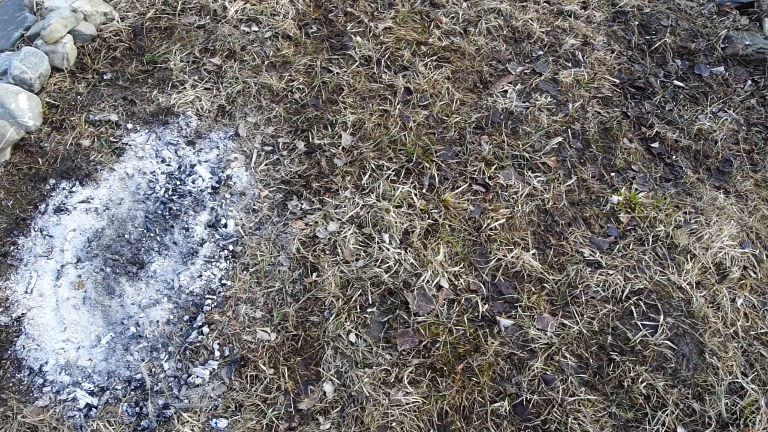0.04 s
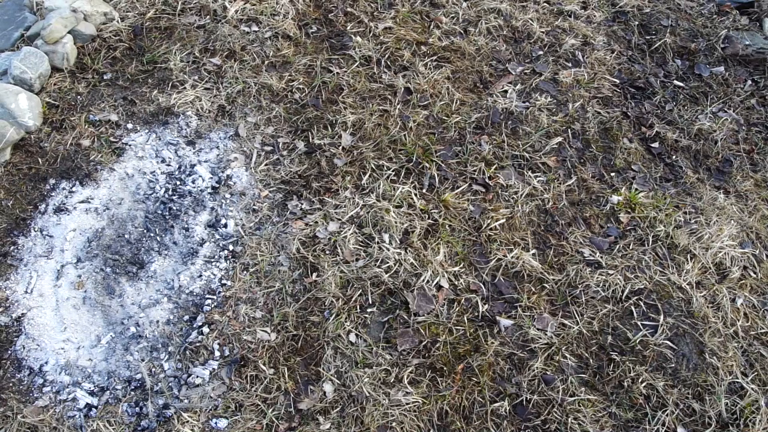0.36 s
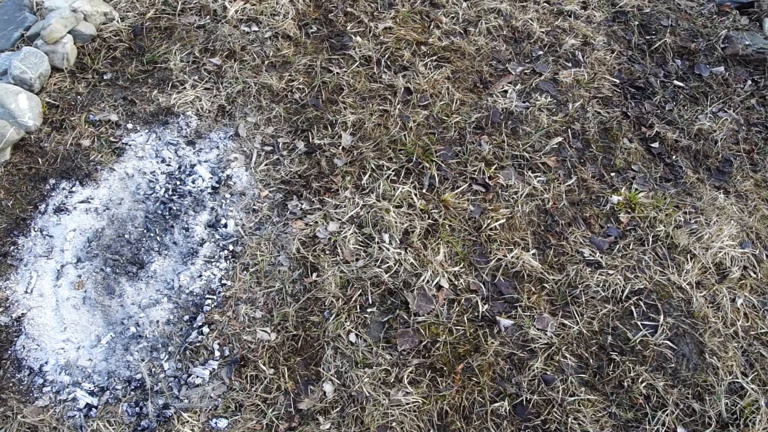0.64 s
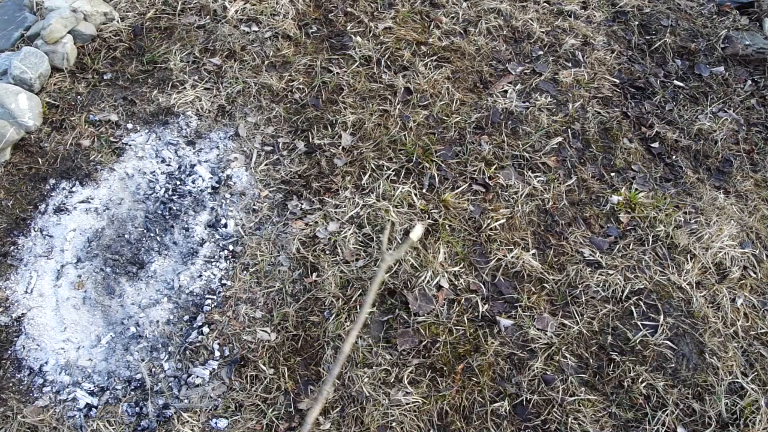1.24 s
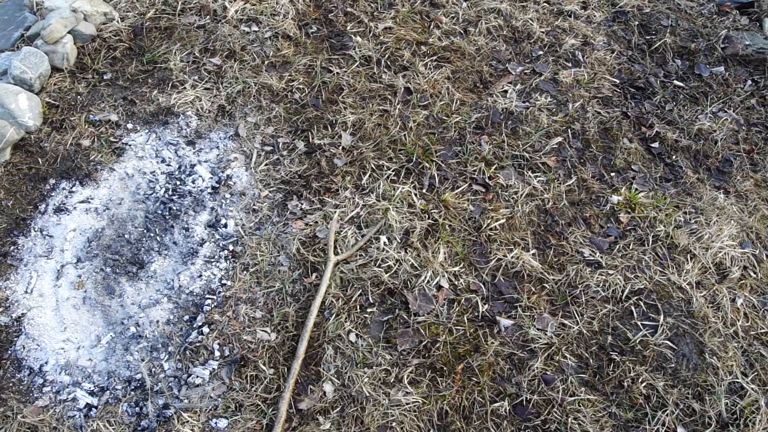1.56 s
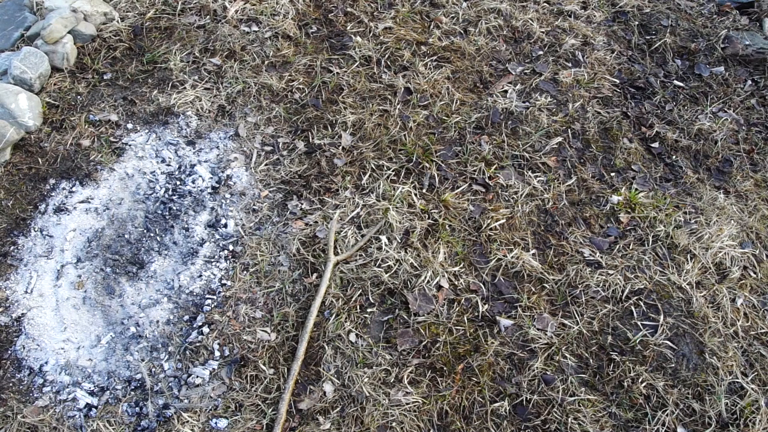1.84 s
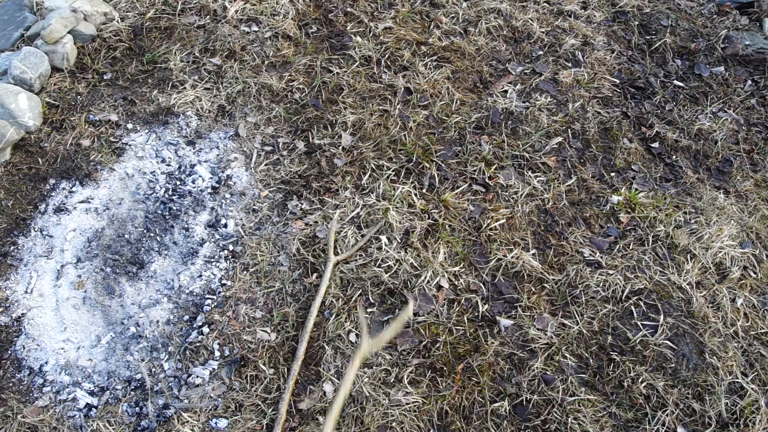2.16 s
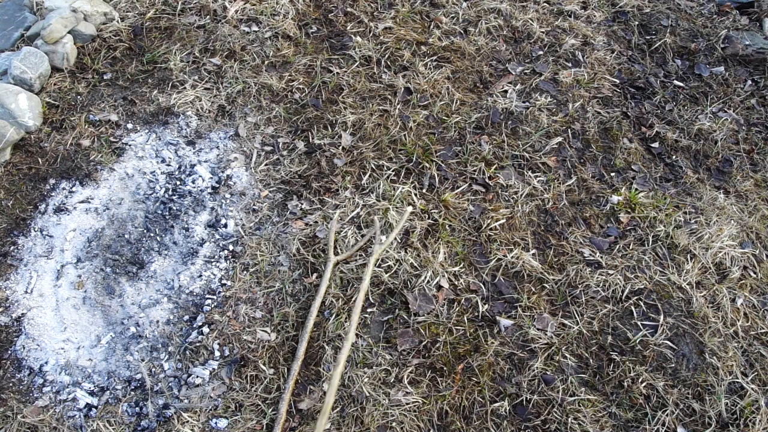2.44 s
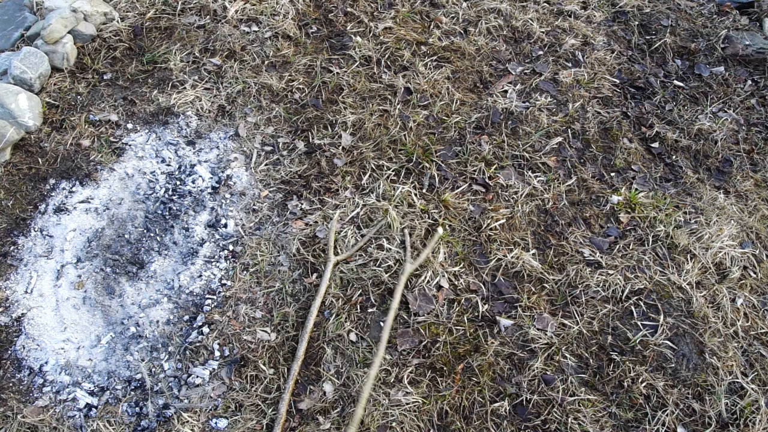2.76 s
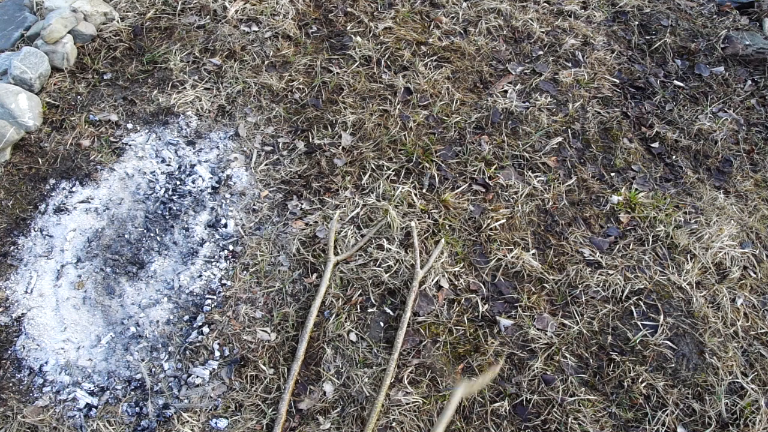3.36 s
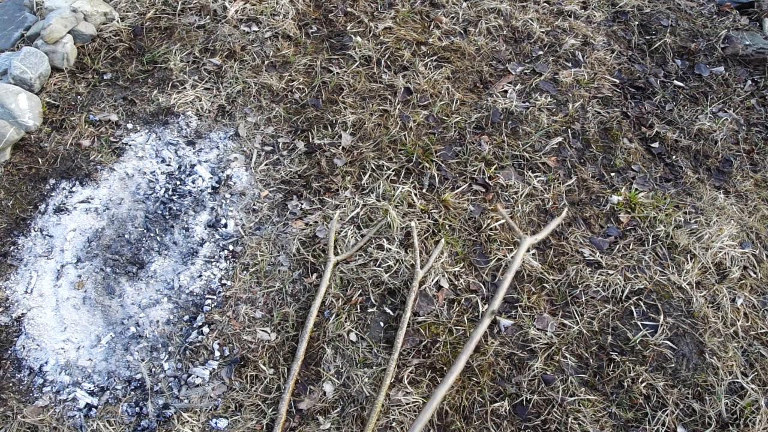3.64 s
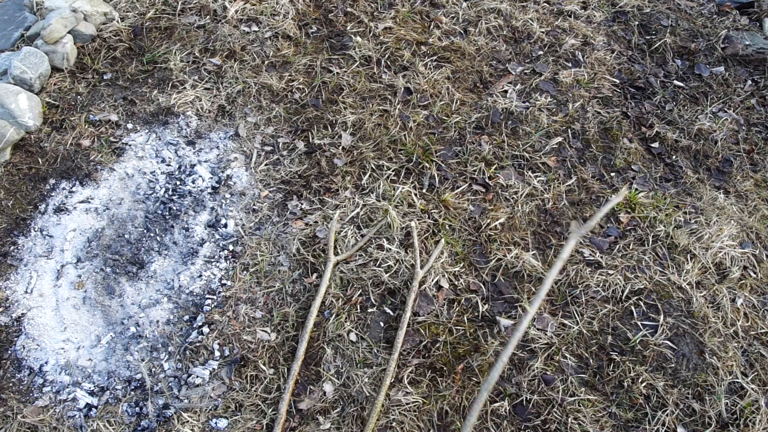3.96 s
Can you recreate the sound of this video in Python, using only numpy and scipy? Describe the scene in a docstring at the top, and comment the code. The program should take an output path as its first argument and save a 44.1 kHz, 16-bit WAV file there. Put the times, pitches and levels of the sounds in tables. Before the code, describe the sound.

Three wooden sticks clack onto dry grass close by, one after another, the first loudest. Each landing brings a crunch and a dull bump, with soft swishes and tiny snaps between. Distant water rushes steadily outdoors.

```python
"""Distant water rushes steadily, a little to the right, under a few faint, high whistles.
Dry stalks swish softly and give tiny snaps. Three forked wooden sticks are laid on the dry grass,
one after another: each crushes the stalks, clacks as the wood rings, and bumps the soil.
The first clack is loud enough to make a limiter turn everything down for a moment."""
import sys
import numpy as np
from scipy import signal
from scipy.fft import rfft, irfft, next_fast_len
from scipy.io import wavfile
from scipy.ndimage import uniform_filter1d, minimum_filter1d, map_coordinates

SR = 44100
rng = np.random.default_rng(int(sys.argv[2]) if len(sys.argv) > 2 else 0)


def log_audio(samples):
    """Write samples as a 16-bit WAV file to the path given in sys.argv[1]."""
    # one column per channel
    frames = np.atleast_2d(samples).T
    # limit to full scale, then quantise
    limited = np.clip(frames, -1, 1)
    pcm = np.round(limited * 32767).astype(np.int16)
    wavfile.write(sys.argv[1], SR, pcm)


N = 176400
T = np.arange(N) / SR
SHARP_ATTACK_S = 0.000088
# the tones heard in each stick's clack (pitch [Hz], level [dB], fade [s]);
# the highest in the first clack is a thin ping, perhaps the microphone ringing
FIRST_STICK = [(1550, -1.5, 0.0036), (1950, -2.5, 0.0054), (3050, 2, 0.0027), (3530, -3.5, 0.0017),
               (11250, -8.5, 0.0022)]
SECOND_STICK = [(1570, -18, 0.035), (1800, -16, 0.054), (2000, -10, 0.036), (2150, -8.5, 0.036),
                (2407, -9, 0.041), (2800, -4.5, 0.031), (3500, -3, 0.0081), (3830, 1, 0.011),
                (4230, -5, 0.012), (4670, -13, .01), (5400, -11, 0.011)]
THIRD_STICK = [(352, -22, .05), (497, -25, .025), (680, -22, 0.022), (1370, -13, 0.01), (2870, -8, 0.019),
               (3050, -3.5, 0.0094), (3840, -2, 0.0043), (4500, -18, 0.0044), (6020, -8.5, .005),
               (7700, -13, 0.0037), (11200, -9, 0.0035)]


def amp(db):
    """Turn decibels into a gain."""
    return 10 ** (np.asarray(db) / 20)


def unit(x):
    """Scale x to an average (rms) level of 1."""
    return x / np.sqrt(np.mean(x ** 2) + 1e-20)


def along(points, hz):
    """Read between (frequency, value) points on a log axis."""
    freqs, values = np.transpose(points)
    return np.interp(np.log(hz + 1), np.log(freqs + 1), values)


def sides(pan_db):
    """Left and right gains; a pan above 0 is to the left."""
    return amp(np.array([[.5], [-.5]]) * pan_db)


def filtered(x, response):
    """Scale each frequency in x by response(hz)."""
    size = next_fast_len(N + SR // 2)
    return irfft(rfft(x, size) * response(np.fft.rfftfreq(size, 1 / SR)), size)[..., :N]


def coloured(x, spectrum):
    """Give x a tone colour, at level 1."""
    return unit(filtered(x, lambda hz: amp(along(spectrum, hz))))


def wobble(rate):
    """A smooth curve through rate random points a second."""
    return map_coordinates(rng.standard_normal(int(N * rate / SR) + 4), [T * rate])


def decay(age, fade, attack):
    """A quick rise at age 0, then a fall of 60 dB every fade seconds."""
    t = np.maximum(age, 0)
    return 1000 ** (-t / fade) * (1 - np.exp(-t / attack))


def swell(peak, rise, fall):
    """Climb 20 dB in the rise time before the peak; drop 20 dB in the fall time after."""
    return 10 ** -np.maximum((peak - T) / rise, (T - peak) / fall)


def water(level_db=-36, waver_db=0.17):
    """Far water rushes steadily: alike in both ears in the bass, wide in the treble."""
    # tone of the rush (frequency [Hz], level [dB])
    spectrum = [(25, -43), (55, -43), (85, -38), (113, -27.5), (161, -16), (250, -9.5), (350, -8.5),
                (410, -9.5), (560, -5), (930, -1), (1390, -2), (2330, -4.5), (3300, -9.5), (5000, -13.5),
                (6850, -19), (9000, -19), (11400, -22), (12600, -25), (15500, -31.5)]
    # how alike the ears are (frequency [Hz], likeness [-1 to 1])
    likeness = [(60, .92), (160, 0.98), (270, 0.96), (450, 0.87), (740, 0.66), (1220, 0.29), (2010, 0.36),
                (3330, 0.26), (5500, -0.38), (9080, -0.14), (15000, 0.0059)]
    # lean to the right (frequency [Hz], pan [dB])
    pan = [(60, -2), (130, 0.0), (290, -0.5), (640, -2.5), (1410, -5), (3100, -5.0), (6820, -3.5),
           (15000, -2.0)]

    def shares(hz):
        width = np.arccos(np.clip(along(likeness, hz), -1, 1)) / 2
        return amp(along(spectrum, hz)) * [np.cos(width), np.sin(width)]

    mid, side = filtered(rng.standard_normal((2, N)), shares)
    rush = filtered(np.array([mid + side, mid - side]), lambda hz: sides(along(pan, hz)))
    return amp(level_db + waver_db * wobble(4.74)) * unit(rush)


def whistles(pitch_hz=11230, width_hz=110, length_s=0.1, edge_s=0.015):
    """Short, thin, fuzzy notes on one pitch, off to the left, perhaps from an insect."""
    # (start [s], level [dB])
    notes = [(-0.03, -62), (0.81, -61.5), (1.935, -62), (2.89, -62), (3.335, -62)]
    tone = unit(filtered(rng.standard_normal(N), lambda hz: np.exp(-((hz - pitch_hz) / width_hz) ** 2)))
    level = sum(amp(db) * np.clip(np.minimum(T - s, s + length_s - T) / edge_s, 0, 1) for s, db in notes)
    return sides(pan_db=8) * level * tone


def stalks(spectrum, clicks_per_s, hiss):
    """Dry stalks make many tiny clicks over a rubbing hiss."""
    clicks = (rng.random(N) < clicks_per_s / SR) * rng.standard_normal((2, N))
    return coloured(unit(clicks) + hiss * rng.standard_normal((2, N)), spectrum)


def swishes():
    """Soft brushing, perhaps of a sleeve or of grass, swells and fades."""
    # (peak time [s], level [dB], rise [s], fall [s], pan [dB])
    strokes = [(.16, -51, .04, .06, 2), (.31, -41.5, 0.099, .06, 5), (1.48, -45.5, .07, .12, -1),
               (1.585, -39.5, 0.063, 0.055, -1), (1.705, -41, 0.04, 0.047, 4), (1.735, -47, .02, .03, 3),
               (2.243, -44, .015, .04, 1), (2.77, -44, 0.074, .05, -1), (2.905, -39.5, 0.049, 0.065, -1)]
    # tone of a swish (frequency [Hz], level [dB])
    spectrum = [(1000, -29), (4000, -4), (7000, -5.5), (10500, 0), (13000, -1), (15500, -4)]
    level = sum(amp(db) * swell(s, rise, fall) * sides(pan) for s, db, rise, fall, pan in strokes)
    return level * stalks(spectrum, clicks_per_s=7000, hiss=1.4)


def snaps(fade_s=0.0077):
    """Single dry stalks break, each with a tiny burst of bright noise."""
    # (time [s], level [dB], pan [dB])
    breaks = [(0.6851, -19.5, -5), (0.93, -31, -1), (1.293, -26, -5), (1.465, -34, -2), (1.7755, -37, -2.5),
              (3.508, -34, -4), (3.699, -29, -5.5)]
    # tone of a snap (frequency [Hz], level [dB])
    spectrum = [(1000, -25), (3900, -14), (4750, 6.5), (5500, -5), (6800, -9), (8300, 1), (9600, -4.5),
                (11300, 3), (12400, -2), (13600, 2), (15500, -1)]
    level = sum(amp(db) * decay(T - s, fade_s, SHARP_ATTACK_S) * sides(pan) for s, db, pan in breaks)
    return level * coloured(rng.standard_normal((2, N)), spectrum)


def crunches():
    """Grass crackles as a stick crushes it."""
    # (peak time [s], level [dB], rise [s], fall [s])
    presses = [(1.173, -39, .004, 0.02), (1.193, -28.5, 0.025, 0.029), (1.207, -34.5, .014, .028),
               (1.228, -33, .016, 0.025), (1.250, -26, 0.0074, 0.021), (1.275, -43, .03, .12),
               (2.599, -33.5, 0.026, 0.018), (2.6099, -20, 0.0076, 0.0046), (2.616, -34.5, 0.017, .04),
               (3.841, -27.5, .005, 0.025), (3.876, -41, 0.022, .025)]
    # tone of a crunch (frequency [Hz], level [dB])
    spectrum = [(300, -30), (1000, -5), (2600, -3.5), (5000, -3), (7000, -4.5), (9500, -1.5), (11400, -1),
                (13000, -3.5), (15500, -1)]
    level = sum(amp(db) * swell(s, rise, fall) for s, db, rise, fall in presses)
    return level * sides(pan_db=-0.5) * stalks(spectrum, clicks_per_s=4500, hiss=1.0)


def clacks(tail_fade_s=0.021):
    """Each stick cracks on contact and rings briefly; ground and stones scatter a short tail."""
    # contacts; the second stick rattles before it lies still (time [s], tones, ring [dB],
    # ring cutoff [Hz], crack [dB], crack fade [s], tail [dB], pan [dB])
    landings = [(1.2420, FIRST_STICK, 4, 16000, -1.5, 0.0037, -11, 0),
                (2.5779, SECOND_STICK, -12.5, 8000, -20, 0.0082, -5, -3),
                (2.5802, SECOND_STICK, -20, 3000, -32, 0.006, -7, -4),
                (2.5860, SECOND_STICK, -27, 3000, -33, 0.005, 0, -4),
                (2.5900, SECOND_STICK, -26, 2300, -38, 0.005, -13, -2),
                (2.5982, SECOND_STICK, -28, 3000, -38, 0.006, -12, -4),
                (2.6084, SECOND_STICK, -27, 2600, -31, 0.0066, -13, -3),
                (3.8417, THIRD_STICK, -22, 4000, -33, 0.015, -10, -7),
                (3.8553, THIRD_STICK, -10.5, 15000, -12.5, 0.0046, -11, -8)]
    # tone of the crack (frequency [Hz], level [dB])
    spectrum = [(200, -7), (1000, -15), (2200, 3), (3000, 6.5), (5200, -7), (7000, 0), (9500, 1),
                (11300, -3), (13000, -2), (15500, -11)]
    out = np.zeros((2, N))
    noise = coloured(rng.standard_normal((2, N)), spectrum)
    t = T[:SR // 8]
    for s, tones, ring_db, top_hz, crack_db, crack_fade, tail_db, pan in landings:
        span = slice(round(s * SR), round(s * SR) + len(t))
        ring = np.zeros(len(t))
        for k, (hz, db, fade) in enumerate(tones):
            strength = amp(db) / np.sqrt(1 + (hz / top_hz) ** 8)  # soft contacts ring only lower tones
            ring += (-1) ** k * strength * np.sin(2 * np.pi * hz * t) * decay(t, fade, SHARP_ATTACK_S)
        crack = noise[:, span] * decay(t, crack_fade, SHARP_ATTACK_S)
        clack = sides(pan) * (amp(ring_db) * ring + amp(crack_db) * crack)
        echoes = rng.standard_normal((2, len(t))) * decay(t, tail_fade_s, attack=0.003)
        echoes /= np.linalg.norm(echoes, axis=1, keepdims=True)
        tail = signal.fftconvolve(clack, echoes, axes=1)[:, :len(t)]
        out[:, span] += clack + amp(tail_db) * tail
    return out


def soil_bumps():
    """The wood settles on the earth with short, dull bumps."""
    # (time [s], level [dB], fade [s], low edge [Hz], high edge [Hz])
    bumps = [(1.243, -25.5, 0.055, 150, 600), (1.252, -41, .08, 78, 200), (1.585, -48, 0.11, 88, 320),
             (2.597, -33.5, 0.044, 150, 700), (2.611, -36, 0.064, 74, 430), (3.844, -28, 0.027, 200, 650),
             (3.8548, -28.5, 0.043, 180, 850), (3.862, -43.5, .10, 78, 230)]
    out = np.zeros(N)
    for s, db, fade, low_hz, top_hz in bumps:
        band = lambda hz: 1 / np.sqrt((1 + (low_hz / (hz + 1)) ** 8) * (1 + (hz / top_hz) ** 6))
        rumble = unit(filtered(rng.standard_normal(N), band))
        push = decay(T - s, fade, attack=0.00077) * rumble
        out += amp(db) * filtered(push, band)
    return out


def scene(bass_cut_hz=220):
    """Sticks, grass and soil in front of the water and the whistles."""
    wood_and_grass = clacks() + crunches() + swishes() + snaps()
    # the wood and grass sounds carry little bass
    light = filtered(wood_and_grass, lambda hz: (1j * hz / (bass_cut_hz + 1j * hz)) ** 2)
    return light + soil_bumps() + water() + whistles()


def record(dry):
    """A limiter turns the loudest peak down, waits and recovers; the highest treble is cut."""
    ceiling, hold_s, release_s, top_hz = 0.57, 0.017, 0.043, 15900
    hold, ahead = int(hold_s * SR) + 1, SR // 500
    excess = np.log(np.maximum(np.abs(dry).max(axis=0) / ceiling, 1))
    held = -minimum_filter1d(-excess, hold, origin=(hold - 1) // 2)
    # the dip follows each new peak at once, then dies away
    dip = np.exp(np.maximum.accumulate(np.log(held + 1e-12) + T / release_s) - T / release_s)
    gain = uniform_filter1d(minimum_filter1d(np.exp(-dip), 2 * ahead), ahead)  # ease in early
    return filtered(dry * gain, lambda hz: hz < top_hz)


dry = scene()
out = record(dry)
log_audio(out)
```